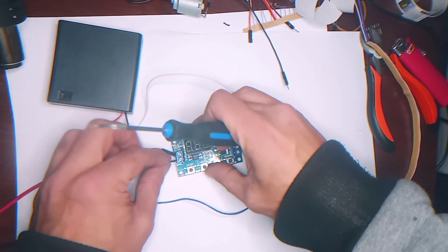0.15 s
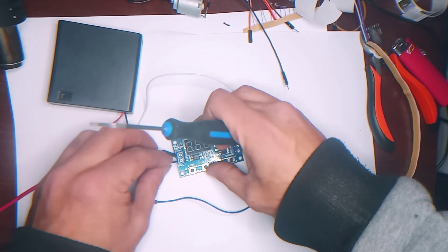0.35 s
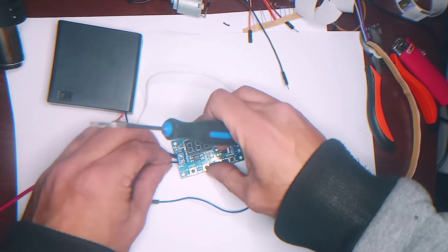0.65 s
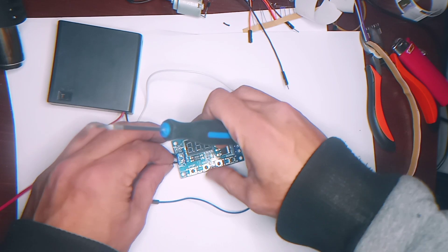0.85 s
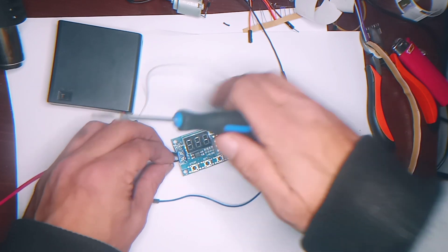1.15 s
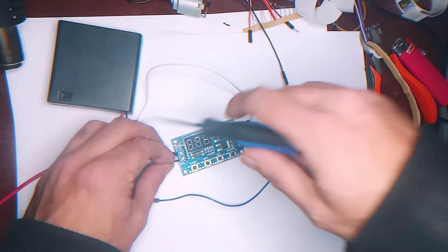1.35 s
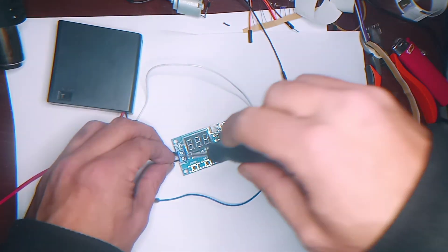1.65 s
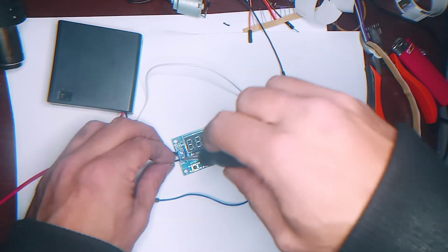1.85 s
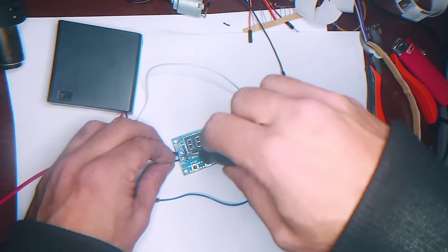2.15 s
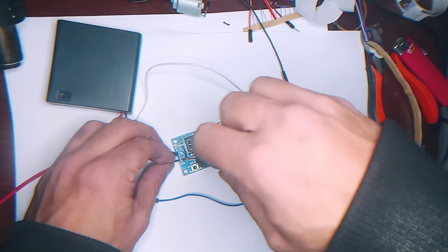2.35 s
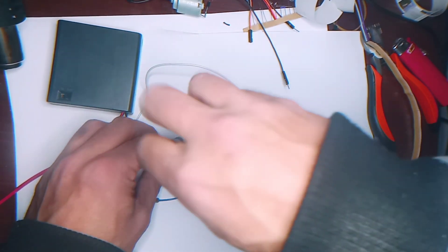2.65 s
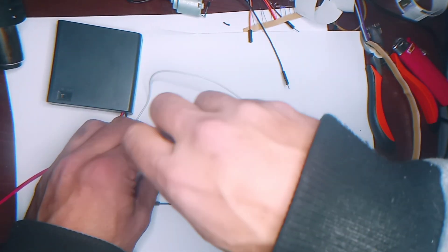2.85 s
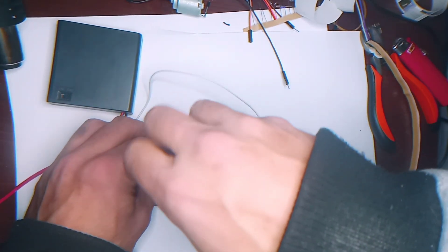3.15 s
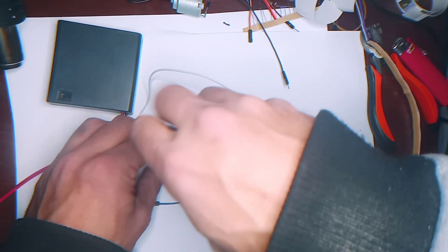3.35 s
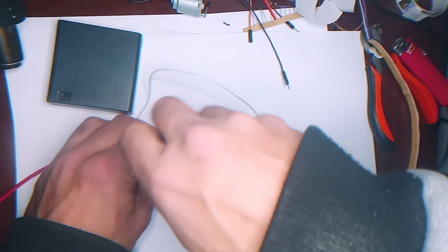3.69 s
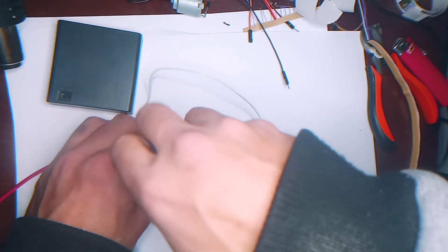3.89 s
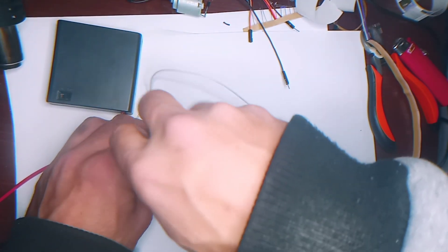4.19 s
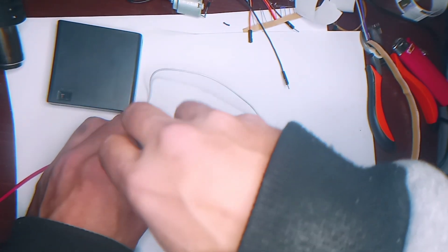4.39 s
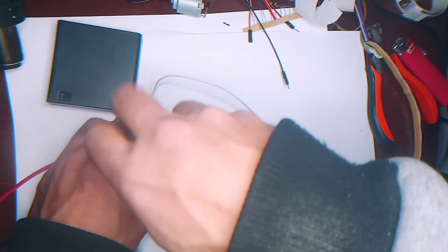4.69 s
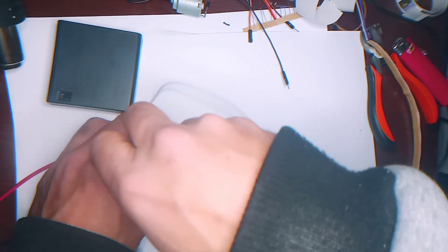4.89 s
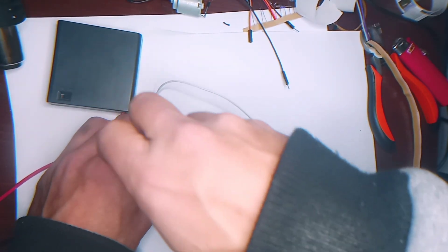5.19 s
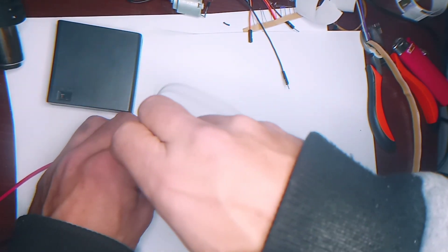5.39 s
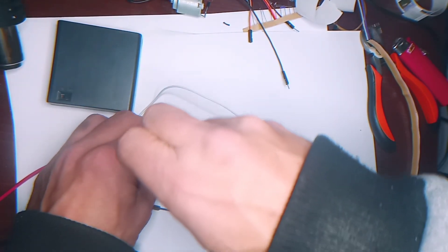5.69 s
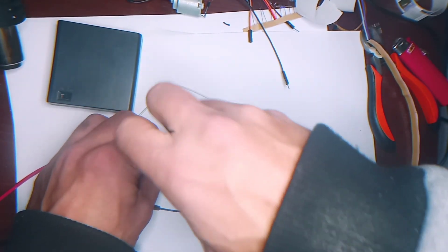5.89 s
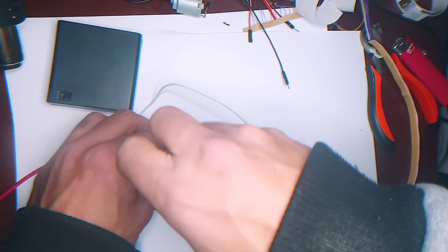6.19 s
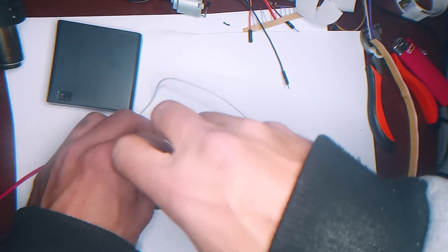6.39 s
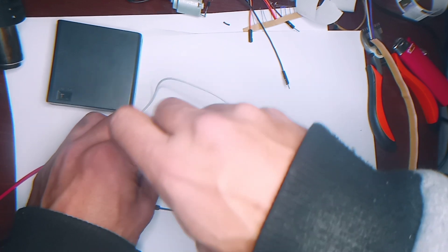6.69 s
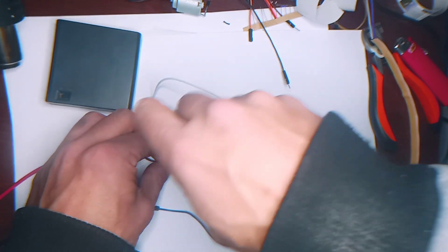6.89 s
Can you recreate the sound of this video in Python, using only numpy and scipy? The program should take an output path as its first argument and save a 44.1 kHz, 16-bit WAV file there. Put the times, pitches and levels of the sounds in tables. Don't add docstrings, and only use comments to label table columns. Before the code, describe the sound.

Close, dry handling sounds in a small room, over a quiet low fan and transformer hum that beats and slowly swells, with soft air noise and faint treble hiss. From 0 to 0.7 s there is light rustling, two thin squeaks and tiny ticks. Around 0.9 to 1.1 s come short scrapes, then a crisp bright metal tick at 1.3 s. It is calm until about 2.25 s, when the board is set down with a light double clack. A press click at 2.65 s leads into wire drags and squeaks around 3 s. A firm board slap with a low thump hits at 3.57 s. Small ticks and scratches follow, clustered near 4.6 s, then sparse scrapes to 5.4 s. A soft knock comes at 5.9 s, a squeak at 6.15 s, the loudest sharp slap at 6.27 s with squeaky dragging, another hard slap at 6.68 s, and a faint last click and scrape near 7 s.

```python
import sys
import numpy as np
from scipy import signal
from scipy.fft import rfft, irfft
from scipy.io import wavfile
from scipy.ndimage import uniform_filter1d

SR = 44100
rng = np.random.default_rng(int(sys.argv[2]) if len(sys.argv) > 2 else 0)


def natural_amplitude(level_db):
    exponent = np.asarray(level_db, float) / 20
    return 10 ** exponent


def unload_wav(signal):
    wavfile.write(
        sys.argv[1],
        SR,
        np.round(np.clip(np.atleast_2d(signal).T, -1, 1) * 32767).astype(np.int16),
    )


N = 310464
SHOT = int(0.15 * SR)


def level(x, db):
    return x * natural_amplitude(db) / np.sqrt(np.mean(x ** 2))


def decay(t, t60):
    return np.exp(-np.log(1000) * t / t60)


def band(x, hz, width):
    low = np.sqrt(hz ** 2 + width ** 2 / 4) - width / 2
    high = min(low + width, 0.45 * SR)
    return signal.sosfilt(signal.butter(2, [low, high], "band", fs=SR, output="sos"), x)


def coloured(points):
    hz, db = np.transpose(points)
    shape = np.interp(np.log(np.fft.rfftfreq(N, 1 / SR) + 1), np.log(hz), db, right=-150)
    return irfft(rfft(rng.standard_normal(N)) * natural_amplitude(shape), N)


def walk(rate):
    k = int(SR / rate)
    steps = np.repeat(rng.standard_normal(N // k + 1), k)
    x = uniform_filter1d(uniform_filter1d(steps, k), k)[:N]
    return x / x.std()


def curve(points):
    return np.interp(np.arange(N) / SR, *np.transpose(points))


def add(out, s, x):
    i = int(s * SR)
    out[i:i + len(x)] += x[:N - i]


def even(x, order):
    spectrum = rfft(x)
    return irfft(spectrum / np.sqrt(uniform_filter1d(np.abs(spectrum) ** 2, order) + 1e-12), len(x))


# frequency in Hz, density in dB per Hz.
HISS_SPECTRUM = [(2000, -19), (6000, 0.5), (8300, -6.5), (10500, 4), (13000, 4.5), (15800, 9)]


def hiss():
    return level(coloured(HISS_SPECTRUM), -82)


# time in seconds, gain in dB.
ARM_SHADING = [(0.0, 4), (0.33, -5.5), (0.6, -5), (1.19, -2), (1.5, -9.5), (1.9, -9), (2.69, -0.5),
               (3.5, 0.5), (4.1, 0.5), (4.65, -3.5), (5.78, -5), (6.1, 3.5), (6.47, 2.5), (7.04, -6)]


def standing_waves():
    return curve(ARM_SHADING)


# frequency in Hz, density in dB per Hz.
AIR_SPECTRUM = [(30, -41.5), (80, -41.5), (120, -34), (160, -35), (230, -19.5), (300, -14), (370, 1.5),
                (420, -12), (465, -12), (520, -23.5), (620, -26.5), (1000, -31.5), (2500, -36),
                (5200, -42.5), (6600, -52), (9000, -53.5)]


def air():
    return level(coloured(AIR_SPECTRUM), -59.5) * natural_amplitude(0.29 * standing_waves() + 1.1 * walk(9.6))


# frequency in Hz, level in dB.
HUM_TONES = [(120.09, -94), (185.38, -87), (239.98, -81), (359.97, -67), (370.75, -62), (479.95, -84)]


def hum():
    beat_s = 0.057
    t = np.arange(N) / SR - beat_s
    swell = 0.45 * standing_waves()
    out = np.zeros(N)
    for hz, db in HUM_TONES:
        loudness = natural_amplitude(db + swell + 1.0 * walk(2.3))
        out += np.sqrt(2) * loudness * np.cos(2 * np.pi * hz * t)
    return out


# band centre in Hz, t60 in seconds, level in dB.
ROOM_BANDS = [(309, 0.3, -13), (890, 0.25, -16.5), (2500, 0.19, -14.5), (5000, 0.18, -18.5),
              (8080, 0.057, -21), (12500, .14, -17)]


def room(x):
    t = np.arange(int(0.5 * SR)) / SR
    tail = np.zeros(len(t))
    for hz, t60, db in ROOM_BANDS:
        echo = band(rng.standard_normal(len(t)), hz, 2.2 * hz) * decay(t, t60)
        echo *= np.minimum(t / 0.015, 1) ** 2
        tail += natural_amplitude(db) * echo / np.sqrt(np.sum(echo ** 2) * SR / 2 / hz)
    return x + signal.fftconvolve(x, tail)[:N] * natural_amplitude(2.5)


# start in seconds, peak level in dB, frequency in Hz.
DESK_THUMPS = [(0.757, -70, 150), (0.892, -65, 118), (1.089, -65, 151), (2.048, -69.5, 149),
               (2.25, -57, 144), (2.971, -65, 134), (3.186, -66, 114), (3.248, -68, 148),
               (3.564, -38, 134.6), (3.656, -55.5, 116), (3.882, -72, 124), (4.463, -56.5, 113),
               (4.621, -71, 116), (4.783, -74, 112), (5.581, -70, 120), (5.808, -71, 119),
               (6.272, -40.5, 136), (6.32, -48.5, 114), (6.673, -48.5, 142), (6.729, -60, 105.3)]


def thumps():
    out, t = np.zeros(N), np.arange(SHOT) / SR
    envelope = np.minimum(t / 0.0078, 1) * decay(t, 0.17)
    envelope *= np.cos(np.pi / 2 * t / t[-1])
    for s, db, hz in DESK_THUMPS:
        add(out, s, natural_amplitude(db + 0.5) * envelope * np.sin(2 * np.pi * hz * t))
    return out


def slides(table, grit_db, flutter_hz, flutter_db, patchy_db, skirt_db, size=16384):
    out = np.zeros(N)
    for s, length, hz, width, db in table:
        chance = rng.standard_normal((3, size))
        n = int(length * SR)
        catch = uniform_filter1d(chance[1], int(SR / flutter_hz))
        grit = chance[0] * natural_amplitude(grit_db * np.abs(chance[1]) + flutter_db * catch / catch.std())
        patches = uniform_filter1d(chance[2, :size // 2 + 1], size // 256)
        body = irfft(rfft(grit) * natural_amplitude(patchy_db * patches / patches.std()))
        body = band(band(body, hz, width), hz, 2.0 * width)
        body = level(body[-n:], db)
        fine = level(np.diff(grit)[-n:], db + skirt_db)
        add(out, s, (body + fine) * np.hanning(n) ** 0.6)
    return out


# time in seconds, activity in dB.
HAND_ACTIVITY = [(0.0, 7), (0.7, 0), (1.05, 13), (1.3, 0), (2.5, -3), (2.9, 3), (3.4, 4.5), (3.75, 7.5),
                 (4.25, -6), (4.63, 6.5), (5.3, -3), (6.0, 4.5), (6.74, 2), (7.04, -6)]


def rustle(count):
    when, pitch, size, span = rng.random((count, 4)).T
    when = when * N / SR
    length = np.minimum(0.03 + 0.074 * span, 0.15)
    hz = 1000 * natural_amplitude(21 * pitch)
    width = 80 + 0.028 * hz
    loud = -87 + np.interp(when, *np.transpose(HAND_ACTIVITY)) + 4 * size - 11 * pitch
    table = np.transpose([when, length, hz, width, loud])
    return slides(table, grit_db=3.0, flutter_hz=80, flutter_db=3.5, patchy_db=5.5, skirt_db=-22.5, size=8192)


# start in seconds, length in seconds, pitch in Hz, level in dB.
THREAD_SQUEAKS = [(0.07, 0.18, 2075, -72.5), (0.237, 0.19, 2034, -69.5), (0.238, 0.11, 3810, -79),
                  (1.095, 0.15, 4390, -82), (1.217, 0.16, 4380, -75), (2.982, 0.043, 5800, -76),
                  (2.996, 0.16, 4300, -82), (3.006, .17, 5430, -87), (3.015, 0.16, 3180, -69),
                  (3.05, .12, 4720, -83), (3.185, .03, 3550, -67), (3.8, .12, 2510, -78),
                  (4.153, .17, 3600, -72.5), (4.178, 0.083, 4730, -84), (6.06, 0.053, 2080, -74.5),
                  (6.143, 0.12, 2045, -68.5), (6.334, .33, 1930, -73.5), (6.398, 0.16, 1487, -71)]


def squeaks():
    table = [(s, length, hz, 125, db) for s, length, hz, db in THREAD_SQUEAKS]
    return slides(table, grit_db=6.0, flutter_hz=60, flutter_db=-4.5, patchy_db=-2.5, skirt_db=-23)


# start in seconds, length in seconds, centre in Hz, level in dB.
HAND_SCRAPES = [(0.047, .35, 2500, -79), (0.878, 0.056, 3900, -64), (0.994, 0.061, 3800, -63.5),
                (1.034, 0.051, 3420, -57.5), (1.097, 0.1, 2500, -78), (0.887, 0.032, 1540, -65),
                (2.799, 0.12, 2270, -64), (2.983, 0.19, 4400, -84), (3.165, 0.12, 1760, -64.5),
                (3.568, 0.16, 1660, -68), (3.604, 0.081, 4430, -67), (3.62, 0.0083, 1590, -51.5),
                (3.643, 0.01, 1900, -60), (3.893, 0.12, 1670, -67.5), (3.957, 0.06, 5000, -61),
                (4.419, 0.25, 5000, -76.5), (4.571, 0.15, 11000, -80), (4.571, 0.033, 3200, -50),
                (4.6, 0.03, 2000, -65), (4.634, 0.032, 4130, -70.5), (4.726, 0.081, 3440, -60),
                (4.85, 0.076, 3400, -62.5), (4.997, 0.052, 2940, -65.5), (5.242, 0.059, 3470, -77.5),
                (5.348, 0.06, 3200, -69.5), (5.95, .3, 2500, -82), (6.953, 0.038, 2860, -72),
                (6.985, 0.062, 1400, -68)]
# start in seconds, length in seconds, centre in Hz, level in dB.
WIRE_DRAGS = [(2.77, 0.078, 2550, -66.5), (2.83, 0.12, 3100, -75), (2.875, 0.045, 6250, -73),
              (4.382, .07, 1870, -71.5), (4.88, .06, 1750, -66), (4.416, 0.05, 5100, -77),
              (5.352, .06, 2690, -70), (5.38, 0.077, 1380, -73.5), (6.304, 0.17, 1700, -66.5)]


def scrapes():
    table = [(s, length, hz, 0.75 * hz, db) for s, length, hz, db in HAND_SCRAPES]
    table += [(s, length, hz, 0.28 * hz, db) for s, length, hz, db in WIRE_DRAGS]
    return slides(table, grit_db=3.5, flutter_hz=220, flutter_db=2.5, patchy_db=3.6, skirt_db=-13.5)


def ring(modes, tilt, scatter_db, dense_db, dense_t60):
    hz, db, t60 = np.transpose(modes)[:, :, None]
    t = np.arange(SHOT) / SR
    sign = (-1) ** np.arange(len(hz))[:, None]
    gain = sign * natural_amplitude(db + tilt(hz) + scatter_db * rng.standard_normal(hz.shape))
    named = np.sum(gain * decay(t, t60) * np.sin(2 * np.pi * hz * t), axis=0)
    f = np.fft.rfftfreq(SHOT, 1 / SR) + 1
    shape = np.interp(np.log(f), np.log(hz[:, 0]), db[:, 0]) + tilt(f)
    octaves_outside = np.maximum(np.log2(np.maximum(hz[0] / f, f / hz[-1])), 0)
    shape -= 18 * octaves_outside
    dense = even(rng.standard_normal(SHOT) * decay(t, dense_t60), order=9)
    dense = irfft(rfft(dense) * natural_amplitude(shape), SHOT)
    dense *= np.minimum(t / 0.00025, 1) * np.cos(np.pi / 2 * t / t[-1])
    return level(named, 0) + level(dense, dense_db)


def rattle(length, spread_db):
    t = np.arange(SHOT) / SR / max(length, 3e-4)
    size = rng.standard_normal(SHOT) * natural_amplitude(spread_db * rng.exponential(size=SHOT))
    envelope = np.minimum(t / 0.47, 1) ** 2 * np.exp(-t ** 2.4)
    return even(size * envelope, order=9) * np.exp(-(t / 4) ** 4)


def strike(force, body, db):
    x = signal.fftconvolve(force, body)[:SHOT]
    return x * natural_amplitude(db) / np.abs(x).max()


def near(ring_hz, octaves):
    def tilt(hz):
        distance = np.log2(hz / ring_hz)
        return 7.8 * distance - 9 * np.hypot(1, distance / max(octaves, 0.15))
    return tilt


# frequency in Hz, level in dB, t60 in seconds.
DESK_MODES = [(192, -25.5, 0.092), (251, -13, 0.3), (310.4, -3, 0.19), (412.3, 4, 0.089), (472.5, 13, 0.15),
              (550, 6, 0.15), (623, -9.5, 0.2), (772, -8.5, 0.18), (865, 2.5, 0.19), (901, -0.5, 0.051),
              (1153, -11.5, 0.14)]
# frequency in Hz, level in dB, t60 in seconds.
BOARD_MODES = [(1414, -10, 0.12), (1489, 2, 0.021), (1966, -1, 0.043), (2500, -0.5, 0.017),
               (2235, 3, 0.0057), (2560, -3, 0.0028), (3200, -10, 0.045), (3610, -7, 0.012),
               (3904, -12.5, 0.026), (4230, -8, 0.019), (5380, -3, 0.0063), (5610, -13, 0.0064),
               (5930, -10.5, 0.024), (6260, -16, 0.018), (6700, -18.5, 0.025), (10020, -24, 0.02),
               (11500, -21, .012), (16120, -27.5, .01)]


def touch(out, s, db, ring_hz, length, desk_db, octaves):
    board = ring(BOARD_MODES, near(ring_hz, octaves), scatter_db=3.0, dense_db=-3.5, dense_t60=0.027)
    desk = ring(DESK_MODES, near(600, 0.6), scatter_db=2.5, dense_db=-3, dense_t60=0.05)
    force = rattle(length, 2.2)
    terminal = strike(force, board, db + 0.23)
    under = band(strike(force, desk, db + desk_db), 650, 3000)
    add(out, s - 0.0012, terminal + under)


# start in seconds, peak level in dB, centre in Hz, spread in octaves.
GLANCING_TICKS = [(0.528, -59, 4670, 0.26), (1.055, -44, 3280, 0.21), (1.066, -44, 3050, 0.52),
                  (1.279, -55, 3120, 0.15), (1.3039, -29.5, 3240, 0.29), (1.311, -32.5, 2900, 0.28),
                  (1.464, -66, 2330, 0.46), (3.857, -57.5, 3780, 0.75), (4.088, -52.5, 3840, 0.8),
                  (4.336, -60, 2780, 0.79), (4.39, -53, 1710, 0.14), (4.483, -61, 5200, .5),
                  (4.533, -53, 5600, 0.5), (4.58, -37, 2730, 0.25), (4.589, -40.5, 2880, 0.7),
                  (4.604, -44, 1730, 0.24), (4.635, -42, 4230, 0.82)]
# start in seconds, peak level in dB, centre in Hz, level of the desk part in dB.
SCREW_PRESSES = [(0.189, -63.5, 3610, 1), (0.65, -62, 2060, 0.1), (0.889, -52.5, 3150, -6.5),
                 (1.128, -56.5, 1950, -11), (2.028, -62, 2680, -4), (2.634, -60, 2900, 3),
                 (2.658, -36.5, 2060, -9), (2.815, -54, 2460, 4), (2.97, -66, 1880, 9),
                 (3.195, -62.5, 2860, 12), (3.215, -45, 4600, 3), (3.249, -61, 2570, 5),
                 (3.747, -53.5, 3900, -10), (3.956, -51, 4050, -10), (3.991, -49.5, 4380, -20),
                 (4.463, -58.5, 2280, -6), (4.659, -56, 4930, -6), (4.887, -53, 2800, -5),
                 (4.998, -65, 1880, 14), (5.016, -53.5, 2940, 2.5), (5.13, -63.5, 3220, -2),
                 (5.19, -79, 4060, 7), (6.029, -62.5, 3200, -3), (6.957, -54, 2340, -7.5)]


def ticks():
    out = np.zeros(N)
    for s, db, hz, octaves in GLANCING_TICKS:
        touch(out, s, db, hz, length=0.0023, desk_db=-28, octaves=octaves)
    for s, db, hz, desk_db in SCREW_PRESSES:
        touch(out, s, db, hz, length=0.00395, desk_db=desk_db, octaves=0.48)
    return out


# start in seconds, peak level in dB, clack brightness in dB,
# thump tilt in dB per octave, clack tilt in dB per octave.
BOARD_KNOCKS = [
    (2.242, -36, 14, 11, 2.5),
    (2.266, -39, 1.5, 12.5, -2),
    (3.5658, -17, 5, 6.5, 0),
    (3.619, -43.5, -20, -10, -2),
    (3.632, -43.5, 12.5, 12, -18),
    (4.242, -40.5, -12, 8.5, -3),
    (5.862, -51, 0.5, -24, -21),
    (5.915, -38, -11, 0.5, -6),
    (6.27, -8.5, 6, -6.5, -2),
    (6.679, -14, 2, -4.5, -1.5),
]


def knocks():
    out, t = np.zeros(N), np.arange(SHOT) / SR
    rattle_s = 0.006794
    rebound_s, rebound_db = 0.0073, -12.5
    settle = natural_amplitude(-10 * np.clip((t - 0.0212) / 0.002, 0, 1))
    touches = [(0.001, 0.2), (0.0022, 1), (0.00214 + 0.4444 * rattle_s, 0.55)]
    blow = sum(size * np.exp(-((t - at) / 0.000087) ** 2) for at, size in touches)
    for s, db, bright_db, thump_db, tilt_db in BOARD_KNOCKS:
        def desk_tilt(hz):
            return thump_db * np.log2(600 / np.maximum(hz, DESK_MODES[0][0]))

        def board_tilt(hz):
            return tilt_db * np.log2(hz / 3000)

        desk = ring(DESK_MODES, desk_tilt, scatter_db=-3.5, dense_db=-4, dense_t60=0.042)
        board = ring(BOARD_MODES, board_tilt, scatter_db=1.0, dense_db=4, dense_t60=0.018)
        slap = strike(blow, desk, db + 1.2)
        shake = rattle(0.4 * rattle_s, 4.0)
        shake += natural_amplitude(rebound_db) * np.roll(rattle(0.36 * rattle_s, 4.0), int(rebound_s * SR))
        clack = strike(shake, board, db - 9.0 + bright_db)
        add(out, s - 0.0014, settle * band(slap, 790, 6000))
        add(out, s - 0.0006, clack)
    return out


def scene():
    work = rustle(count=260) + squeaks() + scrapes() + ticks() + knocks()
    return (hum() + air() + thumps() + room(work))[None]


def roll_off(x):
    return signal.sosfilt(signal.butter(12, 16510, fs=SR, output="sos"), x)


def record(dry):
    ceiling = 0.8
    rounded = ceiling * np.tanh(dry / ceiling)
    mix = signal.sosfilt(signal.butter(4, 92, "high", fs=SR, output="sos"), rounded) + hiss()
    return roll_off(mix)


dry = scene()
out = record(dry)
unload_wav(out)
```